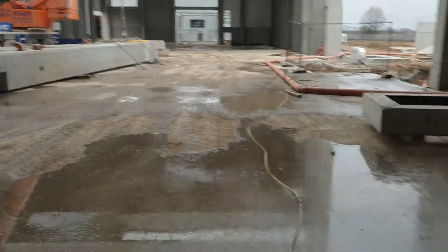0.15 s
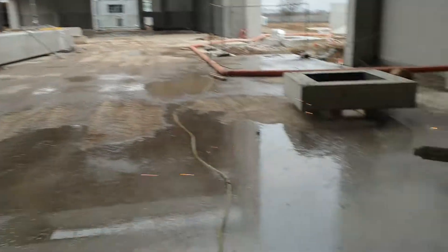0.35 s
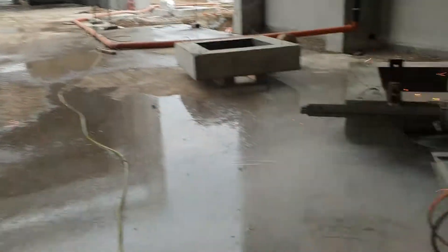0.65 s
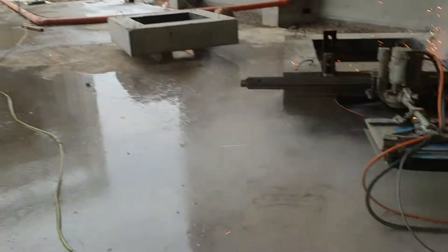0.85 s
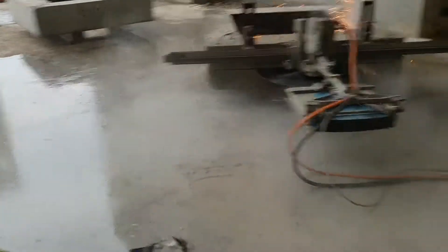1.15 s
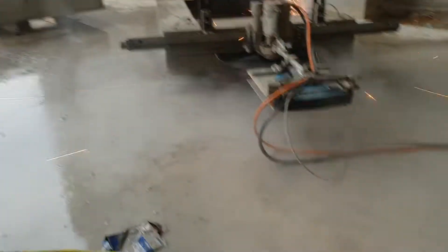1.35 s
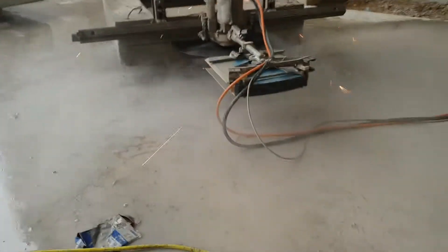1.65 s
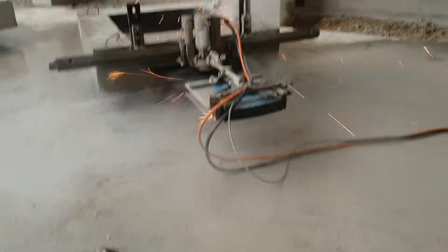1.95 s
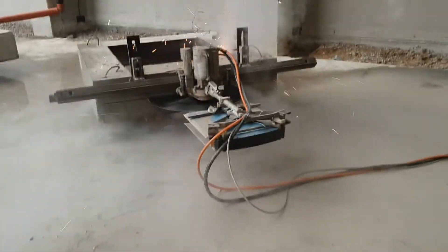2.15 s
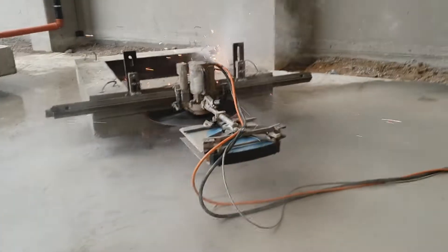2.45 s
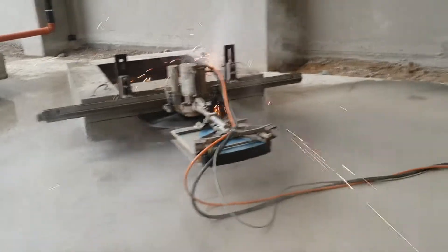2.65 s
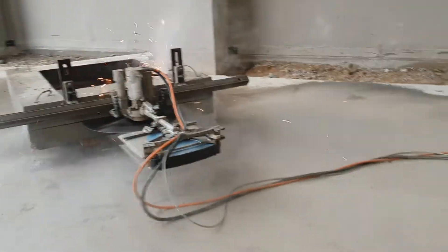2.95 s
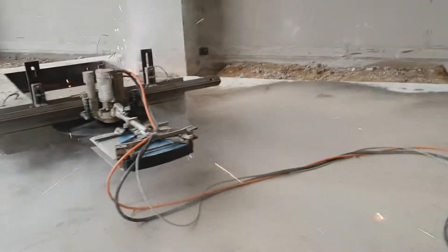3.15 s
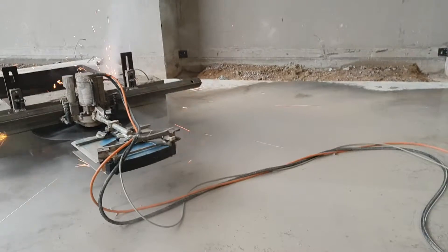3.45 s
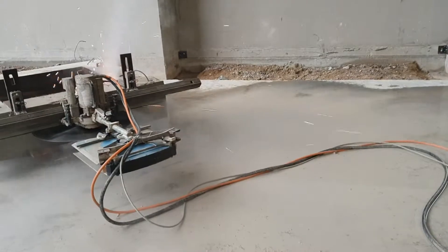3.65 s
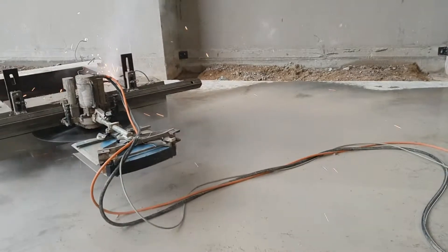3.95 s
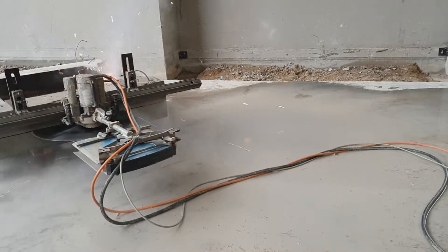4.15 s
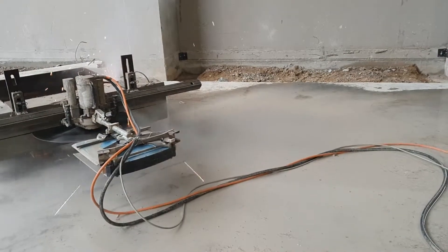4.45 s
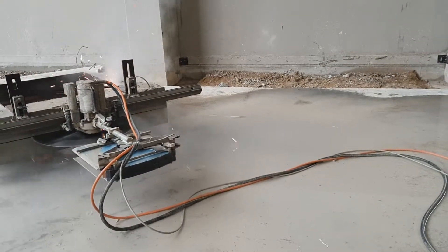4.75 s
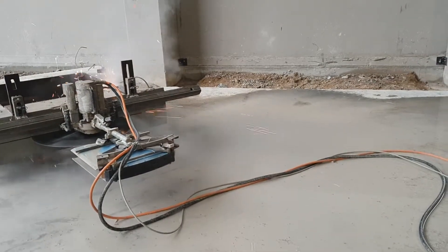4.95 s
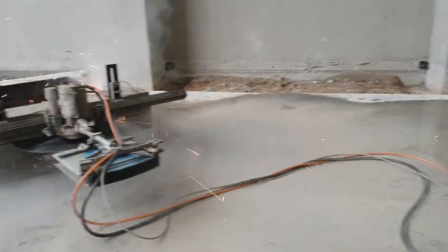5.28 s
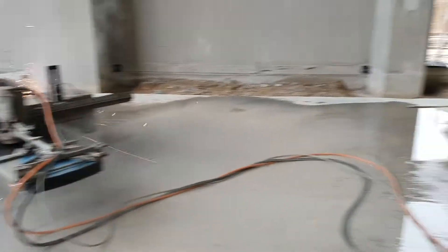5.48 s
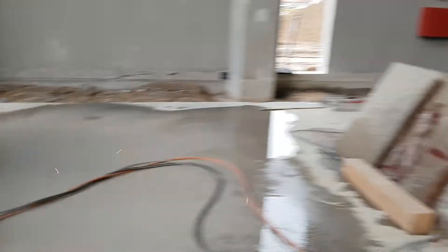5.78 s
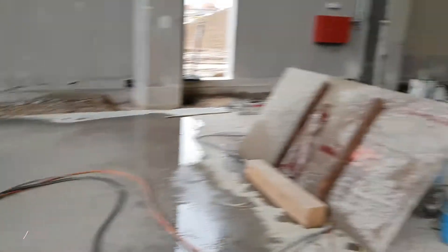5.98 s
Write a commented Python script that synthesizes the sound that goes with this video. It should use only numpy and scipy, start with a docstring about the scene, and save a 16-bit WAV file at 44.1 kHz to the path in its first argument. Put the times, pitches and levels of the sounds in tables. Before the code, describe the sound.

A track-mounted saw grinds steadily through reinforced concrete with a harsh, ringing screech and a high whine, in a bare hall.

```python
"""A harsh, ringing screech with a whine in it: a track-mounted saw grinds through reinforced concrete.
Its 72 diamond segments whine over a 68-tooth gear; the blade turns about 16 times a second, throbs with
its run-out and nearly repeats its grind each turn. A low motor tone comes and goes underneath.
We stand in a bare hall, near enough for the ring to arrive mostly direct, the hiss mostly off the walls.
A hand-held two-port microphone swings past the saw, so the delay between the ports drifts."""
import sys
import numpy as np
from scipy import signal
from scipy.fft import rfft, irfft, next_fast_len
from scipy.io import wavfile
from scipy.ndimage import uniform_filter1d, map_coordinates

SR = 44100
rng = np.random.default_rng(int(sys.argv[2]) if len(sys.argv) > 2 else 0)


def inscribe(sig):
    """Save sig as 16-bit PCM at rate SR to the path in sys.argv[1].

    A 1-D sig is mono; a 2-D sig holds one channel per row.
    Samples are clipped to [-1, 1] before scaling.
    """
    pcm = np.round(np.clip(np.atleast_2d(sig).T, -1, 1) * 32767)
    wavfile.write(sys.argv[1], SR, pcm.astype(np.int16))


N = 269892
STEP = 64  # samples per point of a slow envelope
TIME = np.arange(N) / SR
SLOW = TIME[::STEP]

# The four noises of the cut, low to high. Each row: frequency in Hz, relative level in dB.
DRIVE_SPECTRUM = [(24, -60), (54, -21.5), (110, -22.5), (150, -16), (300, -17.5), (600, -16), (780, -7.5),
                  (1000, -8), (1400, -5), (1800, -8.5), (2020, -7.5), (2220, 5), (2500, 2.5), (2950, 1.5),
                  (3200, -64)]
RING_SPECTRUM = [(2700, -58), (2950, -10.5), (3150, -1.5), (3500, 3.5), (3750, -0.5), (4050, -2.5),
                 (4350, -0.5), (4550, 0), (4700, -25.5)]
SCREECH_SPECTRUM = [(4450, -36), (4600, 7.5), (4850, 4), (5150, 4), (5600, 2), (6100, 4), (6500, 0.5),
                    (7100, 3.5), (7450, -4.5), (7800, -41)]
GRIT_SPECTRUM = [(7100, -54), (7500, 3), (8000, 1.5), (8800, -6.5), (10000, 1), (12000, 1), (13500, 3.5),
                 (14700, -2.5), (16000, 4.5)]
# Run-out in each noise. Each row: swells per turn, relative depth, peak position in turns.
DRIVE_RUN_OUT = [(1, 0.8, 0.057), (4, -0.05, .0)]
RING_RUN_OUT = [(1, 0.2, 0.023), (2, 0.18, 0.085), (3, 1, 0.72)]
SCREECH_RUN_OUT = [(1, 0.66, .01), (2, 0.43, 0.23), (3, 0.6, 0.087)]
GRIT_RUN_OUT = [(1, 1.1, .08)]
# The two loud noises from where we stand. Each row: time in seconds, ring in dB, screech in dB.
CUT_LEVELS = [(0.0, -19.5, -17.5), (0.8, -15.5, -17.5), (1.7, -15, -20.5), (2.3, -15, -19),
              (3.2, -16.5, -19), (3.9, -17.5, -17), (4.7, -18, -19), (5.6, -19.5, -18), (6.12, -21, -20)]

def cut(turn):
    """The blade bites unevenly: drive rumble, ring, screech and grit hiss each drift and throb."""
    grind = patchy(rim_grind(turn, memory=0.951), depth_db=1.0)
    ring_db, screech_db = curves(CUT_LEVELS, TIME)
    layers = [(DRIVE_SPECTRUM, DRIVE_RUN_OUT, -29.5), (RING_SPECTRUM, RING_RUN_OUT, ring_db),
              (SCREECH_SPECTRUM, SCREECH_RUN_OUT, screech_db), (GRIT_SPECTRUM, GRIT_RUN_OUT, -24.5)]
    out = 0
    for spectrum, swells, db in layers:
        band = unit(filtered(grind, lambda hz: amp(along(spectrum, hz)) * disc_resonance(hz)))
        bite_db = 0.82 * wobble(3.264, TIME) + 0.077 * wobble(10, TIME) + 0.5 * wobble(60, TIME)
        out = out + amp(db + bite_db) * run_out(swells, turn) * band
    return out

# The steel disc's modes. Each row: centre in Hz, width in Hz, boost in dB.
DISC_MODES = [(3170, 60, 3), (3265, 40, 3), (3600, 150, 3), (3725, 30, 4), (3924, 40, 3), (4350, 80, 5),
              (4685, 90, 6), (5008, 50, 3), (5110, 80, 5)]

def disc_resonance(hz):
    """The disc rings, lifting the noise around each of its modes."""
    return amp(sum(db / (1 + (2 * (hz - centre) / width) ** 2) for centre, width, db in DISC_MODES))

# The repeating grind. Each row: frequency in Hz, share of the power that comes from the rim pattern.
RIM_SHARE = [(100, 0.17), (200, 0.14), (700, 0.35), (1600, 0.27), (3200, 0.9), (4200, 0.99), (6000, 0.33),
             (9000, 0.26), (15000, 0.073)]

def rim_grind(turn, memory):
    """White noise on three paths; part is a rim pattern that comes round each turn and slowly wears."""
    points = 2688  # around the rim
    rim = rng.standard_normal((3, int(turn[-1]) + 32, points))
    worn = signal.lfilter([1], [1, -memory], rim, axis=1)[:, 30:].reshape(3, -1)
    again = unit(np.array([map_coordinates(path, [turn * points], mode="nearest") for path in worn]))
    fresh = rng.standard_normal((3, N))
    repeating = filtered(again, lambda hz: np.sqrt(along(RIM_SHARE, hz)))
    return repeating + filtered(fresh, lambda hz: np.sqrt(1 - along(RIM_SHARE, hz)))

def run_out(swells, turn):
    """The blade runs out of true, so the load swells within each turn, by a drifting amount."""
    shape = sum(depth * np.cos(2 * np.pi * times * (turn - peak)) for times, depth, peak in swells)
    depth_db = 1.5 + 0.12 * wobble(2.67, TIME)
    return amp(shape * depth_db)

# The blade shaft, sagging as the cut loads it. Each row: time in seconds, turns per second.
SHAFT_SPEED = [(0.0, 16.444), (0.4, 16.446), (0.8, 16.43), (1.25, 16.427), (2.0, 16.39), (2.4, 16.412),
               (2.85, 16.401), (3.6, 16.398), (4.05, 16.432), (4.6, 16.402), (5.8, 16.399), (6.0, 16.391)]

def shaft(slack_turns):
    """Blade angle in turns; the load makes it shiver."""
    shiver = wobble(6, TIME) + 0.32 * wobble(30, TIME)
    return np.cumsum(curves(SHAFT_SPEED, TIME)[0]) / SR + slack_turns * shiver

# Gear mesh (68, 136) and segment rate (multiples of 72). Each row: shaft order, rough share of power.
WHINE_ORDERS = [(68, .05), (72, .05), (136, .04), (144, .15), (216, .06), (288, .1), (360, .5), (432, .85)]
# These tones swell and fade as the microphone moves through the hall.
# Each row: time in seconds, level in dB.
GEAR_1 = [(0.2, -32), (0.6, -55), (1.9, -39), (3.2, -50), (4.1, -55), (4.6, -44), (6.0, -41.5)]
GEAR_2 = [(0.0, -29.5), (1.1, -38.5), (2.7, -32.5), (3.4, -36.5), (3.8, -32), (5.4, -29), (5.7, -36)]
SEGMENT_1 = [(0.2, -45), (0.9, -39), (2.4, -51), (3.6, -44), (4.5, -38), (6.0, -34.5)]
SEGMENT_2 = [(0.4, -49), (1.3, -40.5), (2.1, -47), (3.7, -38), (4.7, -41), (5.4, -36), (5.65, -37),
             (6.0, -29.5)]
SEGMENT_3 = [(0.2, -26), (0.7, -28), (1.4, -20), (2.1, -21.5), (2.5, -25), (3.05, -19.5), (3.65, -27),
             (4.0, -20), (4.65, -17.5), (5.3, -21), (5.65, -29), (6.0, -23)]
SEGMENT_4 = [(0.2, -49), (0.6, -35), (1.2, -24), (2.0, -24.5), (2.4, -28), (2.8, -20.5), (3.6, -19),
             (4.1, -37), (4.9, -19.5), (5.4, -21.5), (5.8, -29)]
SEGMENT_5 = [(0.2, -31), (1.35, -37), (2.0, -28.5), (2.7, -34), (3.3, -28.5), (3.8, -28.5), (4.4, -35),
             (5.0, -31), (6.0, -36)]
SEGMENT_6 = [(0.2, -24), (1.2, -37), (6.0, -45.5)]
WHINE_LEVELS = [GEAR_1, SEGMENT_1, GEAR_2, SEGMENT_2, SEGMENT_3, SEGMENT_4, SEGMENT_5, SEGMENT_6]

def whine(turn):
    """Gear teeth and segments sing; the higher the order, the wider uneven cutting smears it."""
    out = 0
    for (order, rough), levels in zip(WHINE_ORDERS, WHINE_LEVELS):
        db = curves(levels, SLOW)[0] + 0.56 * wobble(2.01, SLOW)
        sideband_db = db.mean() + 0.93 * (db - db.mean())  # follows most of the tone's swell
        cutting = roughness(rough, rate=0.16 * order)
        envelope = amp(db) + amp(sideband_db) * uneven_teeth(order, turn[::STEP])
        out = out + tone(order * turn, cutting * envelope, hall_db=-15)
    return out

# Sidebands of the whine. Each row: shaft order, swells per turn, lower and upper sideband in dB,
# peak position in turns.
TOOTH_SIDEBANDS = [(68, 1, -14, -14, .0), (72, 1, -11, -13, .0), (72, 2, -17, -25, .09),
                   (136, 1, -5, -16, .55), (136, 3, -14, -22, .3), (144, 1, -16, -9, .1),
                   (216, 1, -16, -7, .1), (216, 2, -10, -10, .15), (216, 3, -16, -11, .2),
                   (216, 4, -13, -12, .06), (288, 1, -14, -6, .01), (288, 2, -7, -18, .32),
                   (288, 3, -9, -13, .08), (360, 1, -12, -10, .04), (432, 1, -12, -10, .03)]

def uneven_teeth(order, turn):
    """Uneven teeth swell a tone within the turn, giving sidebands locked to the blade angle."""
    sidebands = 0
    for tone_order, times, lower_db, upper_db, peak in TOOTH_SIDEBANDS:
        if tone_order == order:
            spin = np.exp(2j * np.pi * (times * (turn - peak) + 0.05 * wobble(1, SLOW)))
            drift = amp(0.5 * wobble(0.73, SLOW))
            sidebands = sidebands + drift * (amp(lower_db) / spin + amp(upper_db) * spin)
    return sidebands

# Steadier tones behind the whine. Each row: shaft order, level in dB.
SHAFT_ORDERS = [(9, -62), (10, -64.5), (12, -57.5), (14, -62), (29, -63.5), (30, -58.5), (175, -57),
                (204, -41)]

def shaft_tones(turn):
    """Faint tones locked to the shaft, each wavering in level."""
    return sum(tone(order * turn + rng.random(), amp(db + 2.9 * wobble(1.99, SLOW)), hall_db=-17.5)
               for order, db in SHAFT_ORDERS)

# High multiples of the segment rate, heard mostly off the walls. Each row: shaft order, level in dB.
OVERTONES = [(504, -51), (576, -53), (648, -51), (720, -51), (792, -51), (864, -48), (936, -46)]

def segment_overtones(turn):
    """The segments' blurred top notes pulse once a turn with the run-out."""
    run_out_db = 4.1 * np.cos(2 * np.pi * (turn[::STEP] - 0.06))
    out = 0
    for order, db in OVERTONES:
        smear = amp(db + run_out_db + wobble(1.5, SLOW)) * scatter(0.12 * order)
        out = out + tone(order * turn, smear, hall_db=3)
    return out

# The motor, low under the cut. Each row: time in seconds, pitch in Hz, level in dB.
MOTOR_TONE = [(0.0, 396, -47.5), (0.6, 396, -64), (0.95, 396, -45), (1.6, 398, -67), (2.2, 392, -60),
              (2.6, 390, -48.5), (3.3, 387, -55), (3.65, 375, -53), (4.2, 374, -54.5), (4.6, 385, -50.5),
              (5.15, 387, -46), (5.45, 385, -54), (5.8, 386, -48), (6.12, 384, -58)]

def motor():
    """The motor's tone comes and goes, flickering in level and pitch."""
    hz, db = curves(MOTOR_TONE, TIME)
    hz = hz + 2.02 * wobble(6, TIME)
    flicker = roughness(0.6, rate=12)
    return tone(np.cumsum(hz) / SR, amp(db[::STEP]) * flicker, hall_db=-13.5)

# The cut at our distance. Each row: frequency in Hz, share of the power straight from the saw.
DIRECT_SHARE = [(60, 1), (200, 1), (700, 0.67), (1600, 0.56), (2800, 0.64), (3500, 0.9), (4100, 0.68),
                (5300, 0.65), (6000, 0.33), (7000, 0.1), (9000, 0.041), (15000, 0.028)]

def bare_hall(paths):
    """Shares a noise's power between three paths: direct, hall left and hall right."""
    def response(hz):
        direct = along(DIRECT_SHARE, hz)
        return np.sqrt([direct, 1 - direct, 1 - direct])
    return filtered(paths, response)

# The hand-held swing past the saw. Each row: time in seconds, left port lag in ms, left over right in dB.
MIC_SWING = [(0.0, 0.385, -1.1), (0.3, 0.352, -1.0), (0.85, 0.16, -1.5), (1.45, 0.01, -0.5),
             (1.95, -0.037, -0.8), (2.5, -0.033, -1.5), (2.75, -0.057, -1.5), (3.15, -0.146, -0.9),
             (4.0, -0.151, -0.4), (5.1, -0.154, -0.4), (5.5, -0.22, -0.1), (6.12, -0.42, 1.4)]

def microphone(paths):
    """The direct sound reaches one port before the other; each port gets its own sound of the hall."""
    direct, *hall = paths
    lag_ms, pan_db = curves(MIC_SWING, TIME)
    lag_samples = lag_ms * SR / 1000
    ports = np.array([map_coordinates(direct, [np.arange(N) - delay], order=5, mode="nearest")
                      for delay in (lag_samples / 2, -lag_samples / 2)])
    return (ports + hall) * amp([pan_db / 2, -pan_db / 2])

def tone(cycles, envelope, hall_db):
    """A sine on three paths; on the two hall paths its size and phase wander."""
    carrier = np.sqrt(2) * np.exp(2j * np.pi * cycles)
    paths = [np.ones(len(SLOW)), amp(hall_db) * scatter(2.74), amp(hall_db) * scatter(2.62)]
    return np.array([(np.interp(TIME, SLOW, envelope * path) * carrier).real for path in paths])

def roughness(share, rate):
    """An envelope that smears a share of a tone's power and leaves the rest pure."""
    return np.sqrt(1 - share) + np.sqrt(share) * scatter(rate)

def scatter(rate):
    """A random complex envelope: it smears a tone over about rate Hz."""
    return unit(wobble(rate, SLOW) + 1j * wobble(rate, SLOW))

def patchy(x, depth_db):
    """x with random patches of gain, several hundred Hz wide and a tenth of a second long."""
    spectra = signal.stft(x, nperseg=512)[2]
    patches = uniform_filter1d(rng.standard_normal(spectra.shape[1:]), size=8, axis=0)
    patches = uniform_filter1d(patches, size=16, axis=1)
    return signal.istft(spectra * amp(depth_db * unit(patches)), nperseg=512)[1][:, :N]

def wobble(rate, t):
    """A smooth random curve, rate knots a second."""
    return map_coordinates(rng.standard_normal(1000), [t * np.clip(rate, 0.1, 150)])

def filtered(x, response):
    """x shaped by a gain for each frequency."""
    size = next_fast_len(N + 8192)
    return irfft(rfft(x, size) * response(np.fft.rfftfreq(size, 1 / SR)), size)[..., :N]

def along(points, hz):
    """(Hz, value) points joined on a log axis."""
    freqs, values = np.transpose(points)
    return np.interp(np.log(hz + 1), np.log(freqs + 1), values)

def curves(rows, t):
    """One curve over time for each column after the first."""
    seconds, *columns = np.transpose(rows)
    return [np.interp(t, seconds, column) for column in columns]

def amp(db):
    """Gain of a level in dB."""
    return 10 ** (np.asarray(db) / 20)

def unit(x):
    """x at rms 1."""
    return x / np.sqrt(np.mean(np.abs(x) ** 2) + 1e-20)

def scene():
    """One shaft drives the cut and the whine; with the motor they cross the hall to the microphone."""
    turn = shaft(slack_turns=0.00021)
    paths = bare_hall(cut(turn)) + whine(turn) + shaft_tones(turn) + segment_overtones(turn) + motor()
    return microphone(paths)

def record(dry):
    """Peaks flatten near full scale; nothing is kept above the band limit."""
    flattened = dry / (1 + np.abs(dry / 0.96) ** 8) ** (1 / 8)
    return filtered(flattened, lambda hz: hz < 15740)

dry = scene()
out = record(dry)
inscribe(out)
```